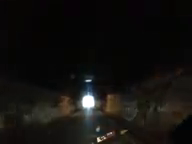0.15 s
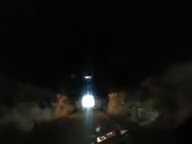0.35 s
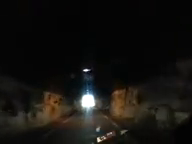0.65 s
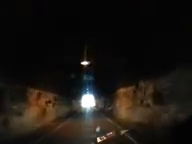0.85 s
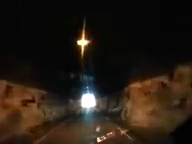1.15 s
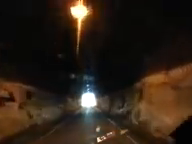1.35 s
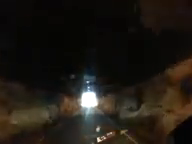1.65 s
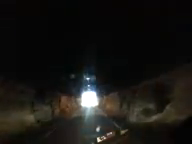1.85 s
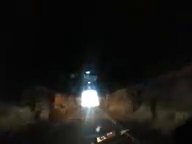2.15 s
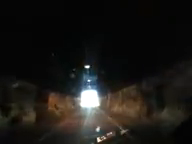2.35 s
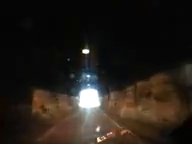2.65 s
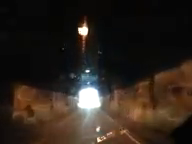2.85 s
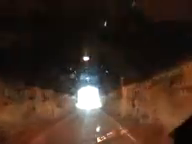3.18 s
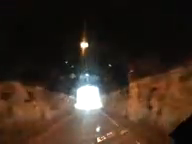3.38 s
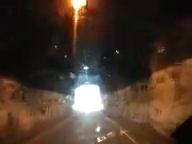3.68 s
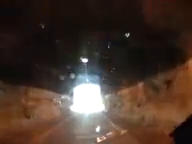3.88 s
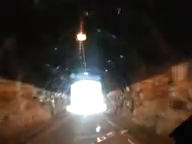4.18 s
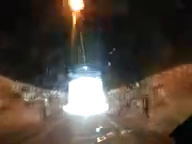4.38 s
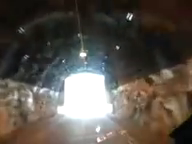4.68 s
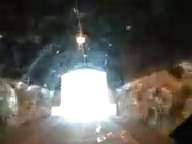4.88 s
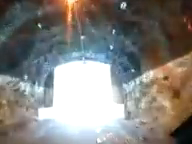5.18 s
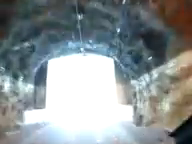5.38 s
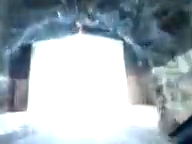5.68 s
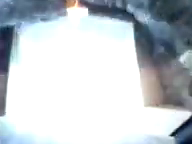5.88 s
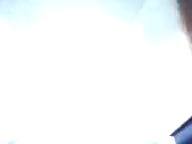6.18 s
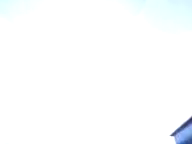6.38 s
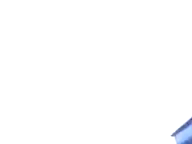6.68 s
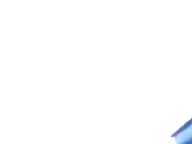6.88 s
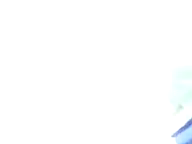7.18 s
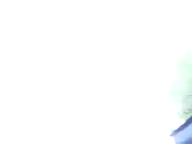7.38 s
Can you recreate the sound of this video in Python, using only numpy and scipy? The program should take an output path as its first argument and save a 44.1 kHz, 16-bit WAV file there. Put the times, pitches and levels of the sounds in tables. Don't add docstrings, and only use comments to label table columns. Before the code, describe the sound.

Low tyre roar fills a car cabin in a tunnel; the engine drops out for a gear change with clunks, then pulls again.

```python
import sys
import numpy as np
from scipy import signal
from scipy.fft import rfft, irfft, next_fast_len
from scipy.io import wavfile
from scipy.ndimage import uniform_filter1d, map_coordinates

SR = 44100
rng = np.random.default_rng(int(sys.argv[2]) if len(sys.argv) > 2 else 0)


def master(y):
    cut = np.clip(np.atleast_2d(y).T, -1, 1)
    pcm = np.round(cut * 32767)
    wavfile.write(sys.argv[1], SR, pcm.astype(np.int16))


def voltage_ratio(level):
    return 10 ** (np.asarray(level, float) / 20)


N = 332504
SECONDS = np.arange(N) / SR
LEFT_RIGHT = np.array([[0.5], [-0.5]])


def unit(x):
    return x / np.sqrt(np.mean(x ** 2) + 1e-20)


def along(points, hz):
    f, v = np.transpose(points)
    return np.interp(np.log(hz + 1), np.log(f + 1), v)


def curves(rows):
    s, *columns = np.transpose(rows)
    return [np.interp(SECONDS, s, column) for column in columns]


def wobble(rate):
    at = np.arange(0, N + 64, 64)
    knots = rng.standard_normal(400)
    return np.interp(np.arange(N), at, map_coordinates(knots, [at * min(rate, 40) / SR]))


def filtered(x, response):
    m = next_fast_len(N + SR // 4)
    return irfft(rfft(x, m) * response(np.fft.rfftfreq(m, 1 / SR)), m)[..., :N]


def mode(f, hz, width):
    return 1j * f * width / (hz * hz - f * f + 1j * f * width)


# frequency in Hz, left-right likeness from -1 to 1.
ALIKE = [(38, .97), (62, .94), (91, .9), (140, .82), (210, .68), (320, 0.78), (490, 0.63), (750, 0.45),
         (920, .35), (1140, -0.33), (1730, -0.4), (2250, -.2), (2900, 0.24), (3400, .15), (4010, -0.13),
         (5000, 0), (14200, 0)]


def diffuse(pair, gain):
    def spread(hz):
        angle = np.arccos(np.clip(along(ALIKE, hz), -1, 1)) / 2
        return gain(hz) * [np.cos(angle), np.sin(angle)]

    mid, side = filtered(pair, spread)
    return unit(np.array([mid + side, mid - side]))


def patchy(patchy_db):
    z = signal.stft(rng.standard_normal((2, N)), nperseg=1024)[2]
    field = uniform_filter1d(rng.standard_normal(z.shape[1:]), size=8, axis=0)
    field = uniform_filter1d(field, size=6, axis=1)
    return signal.istft(z * voltage_ratio(patchy_db * unit(field)), nperseg=1024)[1][:, :N]


# frequency in Hz, level in dB per Hz.
HISS = [(3300, -24.5), (4700, 1.5), (5500, -2.5), (6300, -8), (7400, -1.5), (8500, -0.5), (10600, 0),
        (14000, -1), (14700, -2), (16000, -37)]


def camera_hiss():
    early_s = 0.5
    pace_db, = curves([(s - early_s, db) for s, db in ROAD])
    level_db = -62.5 - 0.58 * pace_db
    hiss = unit(filtered(rng.standard_normal((2, N)), lambda hz: voltage_ratio(along(HISS, hz))))
    whistle = voltage_ratio(-87) * np.sin(2 * np.pi * 9183 * SECONDS)
    return voltage_ratio(level_db) * hiss + whistle


# start in
# seconds, # length in seconds, centre in Hz, width in Hz, level in dB.
SQUEAKS = [(2.217, 0.034, 10200, 1490, -66), (2.642, 0.046, 9992, 3480, -59.5),
           (3.1, 0.025, 5180, 1600, -56.5), (3.69, 0.023, 5100, 900, -61), (3.892, 0.016, 10400, 1490, -66),
           (4.257, 0.0078, 8330, 900, -55.5), (4.272, 0.024, 8300, 600, -65),
           (4.232, .17, 10160, 6500, -56), (4.623, 0.09, 9500, 3440, -64), (6.999, .015, 7800, 450, -59),
           (7.017, 0.02, 7600, 497, -50), (7.018, .018, 5800, 1500, -60), (7, .05, 10400, 5000, -60),
           (7.505, .025, 7900, 3000, -61)]


def squeaks():
    out = np.zeros((2, N + SR))
    f = np.fft.rfftfreq(8192, 1 / SR)
    for s, length, hz, width, db in SQUEAKS:
        start, m = round(s * SR), round(length * SR)
        rub = irfft(rfft(rng.standard_normal((2, 8192))) * mode(f, hz, width) ** 2)
        out[:, start:start + m] += voltage_ratio(db) * np.hanning(m) * unit(rub)[:, :m]
    return out[:, :N]


# start in seconds, peak in dB, low knock in dB.
TICKS = [(2.1484, -34.5, 7), (2.4703, -43, -3), (2.7781, -34, 3), (3.1047, -31.5, -10), (3.273, -53, -4),
         (3.705, -31.5, -6), (3.7139, -43, 14), (3.722, -41, -5), (3.8443, -40.5, -1), (4.2207, -34.5, -18),
         (4.814, -39, -1), (5.255, -39, -7), (6.2597, -41, 6), (6.333, -38.5, -9), (6.413, -38, -1),
         (6.439, -37.5, -9), (7.5026, -33.5, -2)]
# start in seconds, peak in dB, ring in Hz, bright edge in dB.
SNAPS = [(2.6594, -45.5, 2680, -5), (3.6945, -32.5, 2450, -15), (3.9007, -42, 2460, -23),
         (4.3564, -43.5, 3800, -13), (4.446, -35, 2050, -28), (4.4997, -46.5, 3800, -12),
         (5.1537, -43, 2440, -6.5), (5.4853, -38.5, 2490, -11.5), (6.983, -36, 2450, -27),
         (7.022, -32, 2230, -17.5), (7.3553, -52.5, 2900, -14), (7.439, -35.5, 2170, -22.5),
         (7.523, -39, 2500, -13)]


def trim():
    out, t = np.zeros((2, N + SR)), np.arange(2048) / SR
    f = np.fft.rfftfreq(4096, 1 / SR)
    rows = [(s, db, 1960, knock_db, -24) for s, db, knock_db in TICKS]
    rows += [(s, db, hz, 13, edge_db) for s, db, hz, edge_db in SNAPS]
    for s, db, hz, knock_db, edge_db in rows:
        pan_db = -0.5 * rng.standard_normal()
        burst = rng.standard_normal((2, len(t))) * voltage_ratio(-60 * t / 0.036) * (1 - np.exp(-t / 0.0011))
        burst[1] = 0.5 * burst[0] + 0.5 * burst[1]
        spectrum = rfft(burst, 4096)

        def shape(gain):
            return irfft(spectrum * gain)[:, :len(t)]

        life_cycles = 45
        clear = voltage_ratio(-60 * t * hz / life_cycles) * (1 - np.exp(-t / 0.00091)) * np.sin(2 * np.pi * hz * t)
        fuzz = shape(mode(f, hz, 0.45 * hz) ** 3)
        ring = clear + voltage_ratio(-0.5) * fuzz / np.abs(fuzz).max()
        knock = shape(mode(f, 680, 520) ** 3)
        edge = shape(mode(f, 4400, 1900) ** 2)
        parts = [(0, ring), (knock_db - 1.5, knock), (edge_db + 6.0, edge)]
        tick = sum(voltage_ratio(part_db) * part / np.abs(part).max() for part_db, part in parts)
        start = round(s * SR)
        out[:, start:start + len(t)] += voltage_ratio(db + 1.5 + pan_db * LEFT_RIGHT) * tick
    return out[:, :N]


# start in seconds, peak in dB,
# ring in Hz, life in cycles.
KNOCKS = [(4.2763, -36, 3500, 26), (4.2766, -25, 2300, 30), (4.2795, -29, 2970, 33),
          (4.4404, -25, 2570, 45), (5, -28, 2050, 30), (4.4415, -32, 2850, 30), (4.4405, -37, 3600, 30),
          (4.2772, -23.5, 1550, 27), (4.281, -35, 3600, 31), (4.286, -28, 2340, 40), (7.0095, -16, 637, 17),
          (7.0232, -14.5, 700, 20), (7.0245, -28, 920, 24), (7.0228, -36.5, 3700, 40),
          (7.0335, -16.5, 720, 14), (7.0586, -36, 1980, 30), (7.1175, -39, 1580, 27), (5.6, -32, 2500, 40),
          (6.434, -37, 2150, 30), (4.2775, -18.5, 857, 36), (7.342, -36, 3650, 54),
          (7.4457, -30, 2300, 34.5), (7.447, -33, 3100, 42), (7.443, -38, 3100, 30),
          (7.5035, -34, 1900, 26), (7.523, -46, 4400, 31), (.073, -16.5, 560, 7.2), (.761, -15, 560, 5.6),
          (1.014, -19, 600, 6), (1.493, -9.5, 520, 4.2), (3.634, -16, 680, 7), (5.281, -19, 600, 6),
          (7.3935, -10.5, 450, 5.2)]


def knocks():
    out, t = np.zeros(N + SR), np.arange(2048) / SR
    rise = 1 - np.exp(-t / 0.0004)
    for s, db, hz, cycles in KNOCKS:
        start = round(s * SR)
        out[start:start + len(t)] += voltage_ratio(db - 60 * t * hz / cycles) * rise * np.sin(2 * np.pi * hz * t)
    return out[:N] * voltage_ratio(np.array([[-0.3], [0.3]]))


# start in seconds, body in dB, rattle in dB,
# panel note in Hz, note in dB.
LEVER = [(3.845, -24, -49, 381, -22), (3.925, -25.5, -41, 331, -20), (4.2763, -13.5, -10, 837, -15),
         (4.283, -19, -16.5, 1197, -19.5), (4.29, -28, -17, 853, -25), (4.294, -15.5, -24.5, 290, -22),
         (4.329, -22, -25.5, 394, -19), (4.381, -33, -21.5, 507, -30), (4.4409, -43, -33, 570, -37),
         (4.448, -19.5, -31, 291.3, -17.5), (7.010, -28.5, -28, 810, -30), (7.022, -24, -25.5, 850, -30),
         (7.034, -29, -35, 820, -27), (7.057, -33, -38, 550, -26), (7.222, -29, -39, 690, -29),
         (7.392, -35, -42, 413, -36), (7.444, -32, -29, 1000, -30), (7.523, -35.5, -27, 690, -30)]
# frequency in Hz, level in dB, time to fall 60 dB in seconds.
CONSOLE = [(124, -9, 0.25), (153, -2.5, 0.17), (257, -5.5, 0.03), (284, 2.5, 0.098), (369, -2.5, 0.13),
           (410, -5.5, 0.42), (533, -4, 0.091), (690, -9, 0.045), (1030, -5, 0.041), (1904, -16, 0.091),
           (2325, -15.5, 0.059)]
# centre in Hz, width in Hz, level in dB.
RATTLE = [(1015, 430, 5.5), (1620, 480, 2.5), (2300, 350, -3.5), (3570, 800, -24)]


def lever():
    ring, shake = np.zeros((2, N + SR)), np.zeros((2, N + SR))
    t = np.arange(SR // 4) / SR
    rise = 1 - np.exp(-t / 0.001)
    stretch, note_cycles = 0.62, 53
    fall = voltage_ratio(-60 * t / (0.05 * stretch)) + 0.21 * voltage_ratio(-60 * t / 0.34)
    for s, ring_db, rattle_db, note_hz, note_db in LEVER:
        tones = 0
        for hz, level_db, t60 in CONSOLE:
            phase = 6 * rng.random() + rng.normal(0, 0.53, (2, 1))
            envelope = voltage_ratio(level_db + rng.normal(0, 0.7) - 60 * t / (t60 * stretch))
            tones = tones + envelope * np.sin(2 * np.pi * hz * t + phase)
        note = voltage_ratio(note_db - 60 * t * note_hz / note_cycles) * np.sin(2 * np.pi * note_hz * t)
        rattle = voltage_ratio(rattle_db + 1) * rng.standard_normal((2, len(t))) * fall
        start = round(s * SR)
        ring[:, start:start + len(t)] += (voltage_ratio(ring_db - 4.5) * tones + note) * rise
        shake[:, start:start + len(t)] += rattle * rise

    def colour(f):
        return sum((-1) ** k * voltage_ratio(db) * mode(f, hz, width) for k, (hz, width, db) in enumerate(RATTLE))

    return ring[:, :N] + filtered(shake[:, :N], colour)


def gearbox():
    from_s, to_s, rise_s, fall_s = 4.25, 6.0, 0.067, 0.2
    t = SECONDS - from_s
    on = np.clip(np.minimum(t / rise_s, (to_s - from_s - t) / fall_s), 0, 1) ** 2
    hz = 534 - 15 * t - 19 * t * t
    turns = np.cumsum(hz * (1 + 0.008 * wobble(14))) / SR
    level_db = -38.5 - 2 * t + 4.3 * wobble(7)
    return np.sqrt(2) * on * voltage_ratio(level_db) * np.sin(2 * np.pi * turns + 0.8 * LEFT_RIGHT)


# time in seconds, firing rate in Hz.
ENGINE = [(0, 74), (.4, 72), (1.8, 74), (2.4, 73.83), (2.6, 73.24), (3.6, 72.9), (3.88, 62.54), (4.1, 52.6),
          (5.45, 53.81), (5.7, 64.96), (6.0, 78.4), (6.1, 76.83), (6.7, 75.56), (7.15, 75.77), (7.3, 73.9),
          (7.54, 70.4)]
# time in seconds, load from 0 to 1, share of the upper ring from 0 to 1.
THROTTLE = [(0, 0.9, 0.3), (1.2, .65, 0.2), (2.4, .9, .2), (3.55, 0.6, 0.13), (3.7, 0, 0.2),
            (5.95, 0.05, 0.6), (6.1, 0.8, 0.6), (6.6, 0.56, .9), (7.25, 0.7, 0.9), (7.38, 0.05, 0.7)]
# multiple of the firing rate, level in dB.
LOWER = [(1, -42), (2, -35.5), (3, -40)]
# multiple of the firing rate, level in dB relative to the third tone.
UPPER = [(4, -6), (5, 0), (6, -4), (7, -21.5), (9.4, -4.5)]
# centre in Hz, width in Hz, level in dB.
BLOCK = [(2028, 55, 10), (2384, 40, 7.5)]


def engine():
    hz, = curves(ENGINE)
    load, upper = curves(THROTTLE)
    clutch_down_s, clutch_up_s, let_go_s, bite_s = 4.1, 5.39, 0.13, 0.34
    clutch_s = [clutch_down_s - let_go_s, clutch_down_s, clutch_up_s, clutch_up_s + bite_s]
    pulling = np.interp(SECONDS, clutch_s, [1, 0, 0, 1])
    turns = np.cumsum(hz * (1 + 0.00412 * wobble(9))) / SR
    speed_db = 7.5 * np.log2(hz / 74)
    pull_db = 9 * load * upper
    third, third_db = LOWER[-1]
    fifth = UPPER[1][0]
    apart = 0.24 * LEFT_RIGHT
    hum = 0
    for k, db in list(LOWER) + [(k, third_db + db) for k, db in UPPER]:
        pull_share = (k == third) + 0.5 * (k == fifth)
        level_db = db + speed_db + pull_db * pull_share + 1.6 * wobble(8)
        tone = np.sin(k * (2 * np.pi * turns + apart) + 6 * rng.random())
        hum = hum + np.sqrt(2) * voltage_ratio(level_db) * tone
    gate = np.exp(1.6 * np.cos(2 * np.pi * turns))
    rings = []
    for centre, width, db in BLOCK:
        clatter = gate * rng.standard_normal((2, N))
        rings.append(voltage_ratio(db) * diffuse(clatter, lambda f: mode(f, centre, 1.5 * width) ** 2))
    return pulling * hum + voltage_ratio(-56.0) * load * (rings[0] + upper * rings[1])


# time in seconds, centre in Hz, level in dB.
TYRE_RING = [(0, 255.3, -38.5), (1.2, 253.9, -41.5), (2.0, 246, -37), (2.7, 240, -37), (3.6, 236.9, -35),
             (4.8, 239.9, -36), (5.3, 235.9, -40.5), (7.54, 242, -51)]


def tyre_ring():
    hz, db = curves(TYRE_RING)
    flutter = wobble(30) + 1j * wobble(30)
    carrier = np.exp(2j * np.pi * np.cumsum(hz) / SR + 0.6j * LEFT_RIGHT)
    return voltage_ratio(db) * unit(np.real(flutter * carrier))


# time in seconds, level in dB relative to the start.
ROAD = [(0, 0.5), (1.3, 0.14), (2.3, 0.77), (3.6, 0), (4.5, -1.5), (5.0, -2.5), (5.6, -2.5), (6.9, -2.5),
        (7.54, -2)]
# time in seconds, boom lift in dB.
BUMPS = [(0, 9.5), (.68, 7), (1.05, 0.5), (2.05, 8), (2.68, 4.5), (3.68, 8), (4.13, 2.5), (4.75, 8.5),
         (5.0, 5.5), (5.67, 3), (7.27, 5), (7.54, 8)]
# frequency in Hz, level in dB per Hz.
BOOM = [(12, -69), (20, -64), (60, -12), (75, -5.5), (89, -5), (108, 4.5), (127, 6), (140, -21.5),
        (200, -2.5), (260, -30.5), (440, -120)]
ROAR = [(100, -23.5), (170, -3.5), (230, -6.5), (269, -2.5), (362, -4), (420, -9), (459, -7), (722, -12.5),
        (1000, -19), (1300, -20), (2200, -120)]
TREAD = [(500, -30), (850, -5), (915, -2), (993, -4.5), (1110, -1), (1310, -6.5), (1370, -4.5), (1770, -10),
         (2060, -11.5), (2190, -11), (3250, -18), (4050, -29), (5000, -38), (6000, -58), (7800, -97),
         (13200, -120)]
SUSPENSION = [(15, -45), (28, -14), (45, -4.5), (62, 16), (85, -32), (150, -120)]
# centre in Hz, width in Hz, lift in dB.
CABIN = [(115.5, 2.8, 3), (240, 14, 4), (290, 3.8, 0), (392, 17, 4.5), (407, 3.1, -2), (719, 37, 1)]


def road():
    pace_db, = curves(ROAD)
    bump_s = 0.088
    bumps_db = sum(db * np.exp(-((SECONDS - s) / bump_s) ** 2 / 2) for s, db in BUMPS)

    def shell(hz):
        return np.sqrt(1 + sum(np.abs(voltage_ratio(db) * mode(hz, c, w)) ** 2 for c, w, db in CABIN))

    surface = wobble(7)
    boom_db = -37.5 + 1.6 * pace_db + bumps_db + 2.0 * surface
    roar_db = -25 + pace_db + 0.5 * surface
    tread_db = -35.5 + 1.2 * pace_db + 0.5 * surface + 0.33 * wobble(25)
    sway_db = -58.5 + bumps_db / 2 + 2.4 * wobble(4)
    boom = voltage_ratio(boom_db) * diffuse(patchy(-1.0), lambda hz: voltage_ratio(along(BOOM, hz)) * shell(hz))
    roar = voltage_ratio(roar_db) * diffuse(patchy(0.09), lambda hz: voltage_ratio(along(ROAR, hz)) * shell(hz))
    tread = voltage_ratio(tread_db) * diffuse(patchy(0.5), lambda hz: voltage_ratio(along(TREAD, hz)))
    sway = voltage_ratio(sway_db) * diffuse(patchy(3.0), lambda hz: voltage_ratio(along(SUSPENSION, hz)))
    return boom + roar + tread + sway


def scene():
    blows = filtered(lever() + trim() + knocks(), lambda f: 1 / (1 + (f / 5400) ** 12))
    return camera_hiss() + squeaks() + blows + gearbox() + engine() + tyre_ring() + road()


# frequency in Hz, left over right in dB.
LEAN = [(60, -1.1), (180, -0.64), (530, -1), (1590, 0.2), (4740, 0.37), (14200, -1.0)]
# frequency in Hz, lead in radians.
LEADS = [(60, .05), (400, .15), (800, .2), (1600, .3), (2250, .9), (2600, -.4), (3600, -.3), (4500, 0)]


def microphones(x):
    def response(hz):
        return voltage_ratio(along(LEAN, hz) * LEFT_RIGHT) * np.exp(1j * along(LEADS, hz) * LEFT_RIGHT)

    return filtered(x, response)


# frequency in Hz, step in dB over the usual line level.
COARSE = [(60, -48), (300, -28.5), (1500, -14.5), (2900, -10.5), (4000, -1.5), (5000, 0.5), (5700, 9.5),
          (6300, 9.5), (6900, 9), (7800, 9.5), (9000, 4), (14500, 4.5)]


def squeeze(x):
    size, lead = 1024, 2048 - 390
    n, k = np.arange(2 * size), np.arange(size)
    basis = np.cos(np.pi / size * np.outer(n + 0.5 + size / 2, k + 0.5)) * np.sqrt(2 / size)
    halves = np.pad(x, ((0, 0), (lead, -(N + lead) % size + size))).reshape(2, -1, size)

    steep = np.cumsum(np.kaiser(size + 1, 4 * np.pi))
    steep_rise = np.sqrt(steep[:-1] / steep[-1])
    soft_rise = np.sin(np.pi * (k + 0.5) / (2 * size))
    rises = np.where(rng.random((halves.shape[1], 1)) < 0.28, steep_rise, soft_rise)
    window = np.concatenate([rises[:-1], rises[1:, ::-1]], axis=1)
    lines = np.concatenate([halves[:, :-1], halves[:, 1:]], axis=2) * window @ basis
    blocks, bands = lines.shape[1], size // 32

    usual = np.sqrt(uniform_filter1d(np.median(lines ** 2, axis=(0, 1)), size=16) * 2)
    mood = np.repeat(rng.standard_normal((2, blocks, bands)), 32, axis=2)
    budget = rng.standard_normal((blocks, 1))
    busy = np.sqrt(uniform_filter1d(np.mean(lines ** 2, axis=(0, 2)), size=15))[:, None]
    step_db = along(COARSE, (k + 0.5) * SR / 2 / size) + 2.0 * mood + 0.91 * budget
    step = usual * voltage_ratio(step_db) * (busy / np.median(busy)) ** 0.85 + 1e-9

    chance = rng.random((blocks, 1)) + 0.15 * rng.standard_normal((blocks, bands))
    joint = np.repeat(chance < 0.65, 32, axis=1)

    def turn(v):
        return np.where(joint, np.array([v[0] + v[1], v[0] - v[1]]) / np.sqrt(2), v)

    lines = turn(lines)
    rounded = np.sign(lines) * np.floor(np.abs(lines) / step + 0.4) * step
    back = turn(rounded * (k < 678)) @ basis.T * window
    out = back[:, 1:, :size] + back[:, :-1, size:]
    return out.reshape(2, -1)[:, lead - size:][:, :N]


def roll_off(x):
    return signal.sosfilt(signal.butter(12, 14750, fs=SR, output="sos"), x)


def record(dry):
    mix = squeeze(microphones(dry))
    return roll_off(mix)


dry = scene()
out = record(dry)
master(out)
```